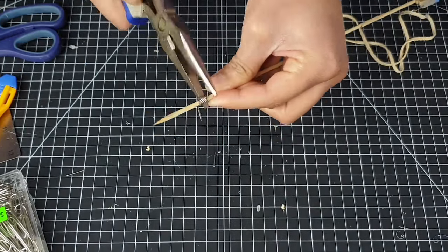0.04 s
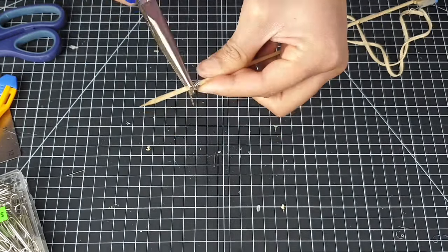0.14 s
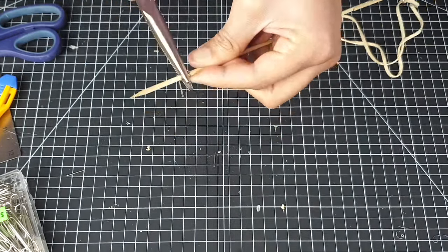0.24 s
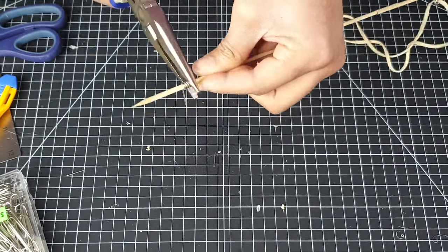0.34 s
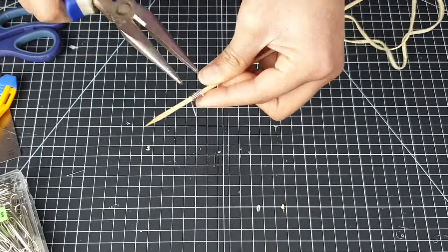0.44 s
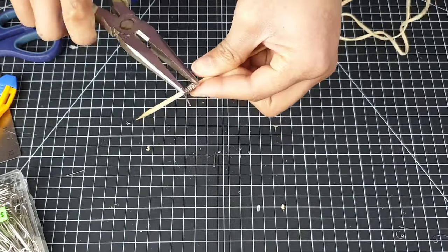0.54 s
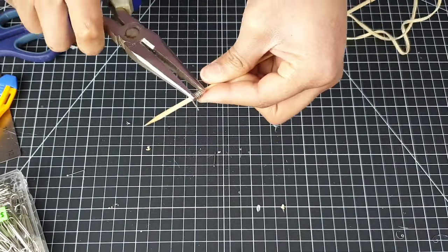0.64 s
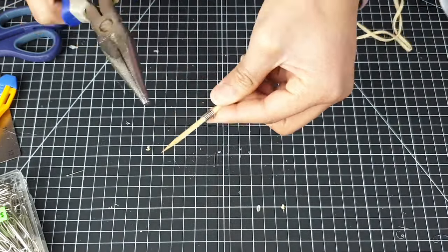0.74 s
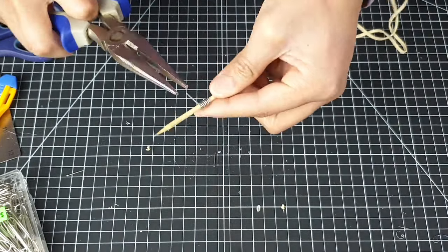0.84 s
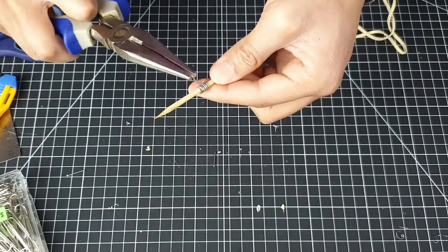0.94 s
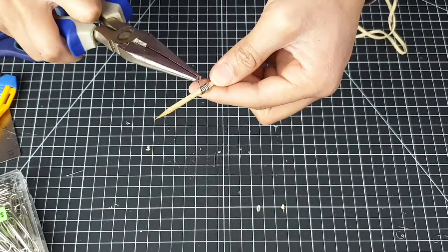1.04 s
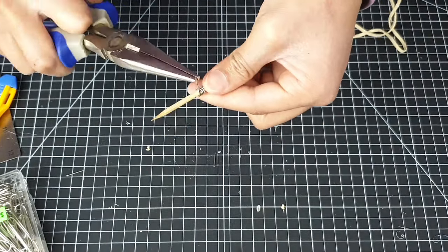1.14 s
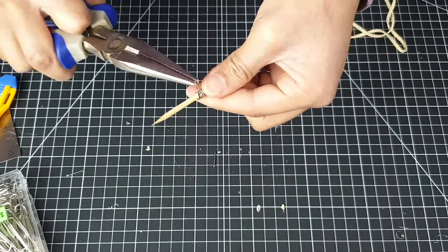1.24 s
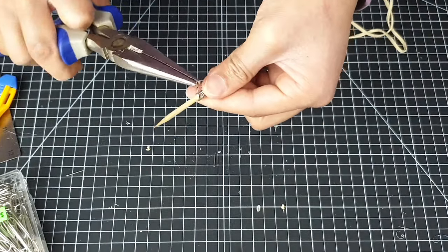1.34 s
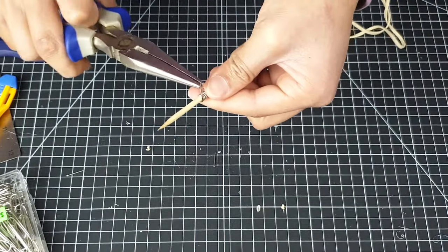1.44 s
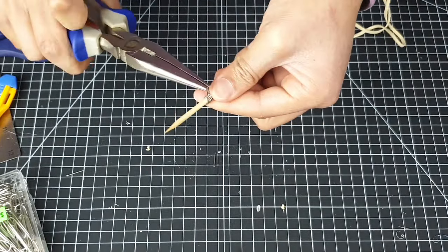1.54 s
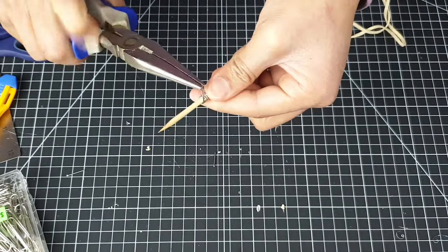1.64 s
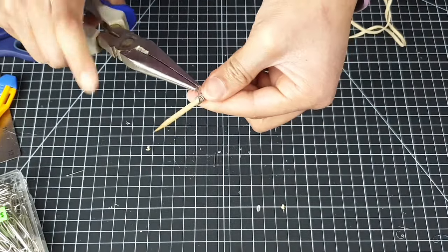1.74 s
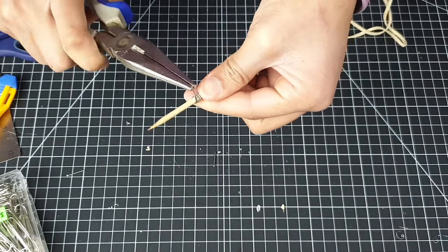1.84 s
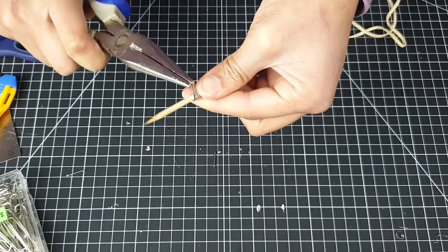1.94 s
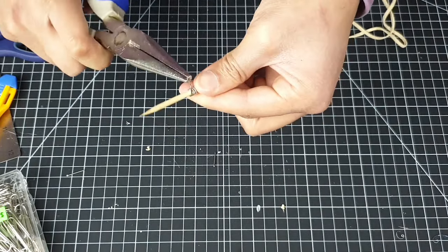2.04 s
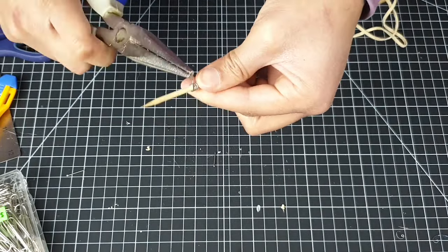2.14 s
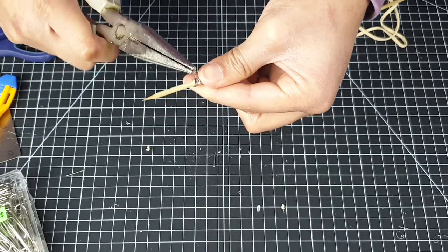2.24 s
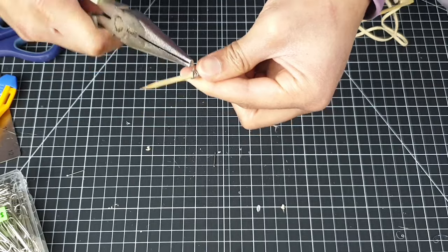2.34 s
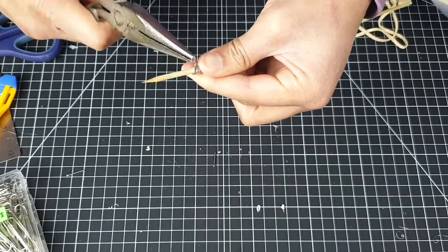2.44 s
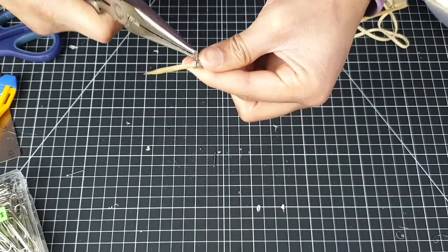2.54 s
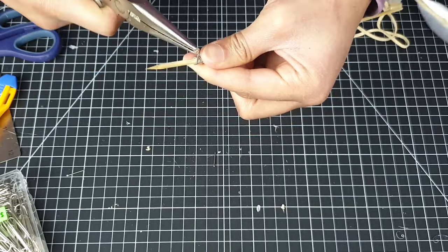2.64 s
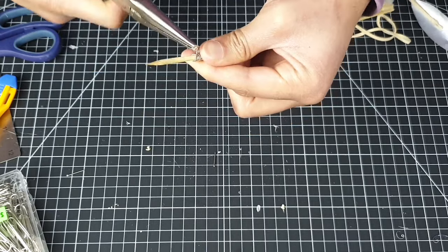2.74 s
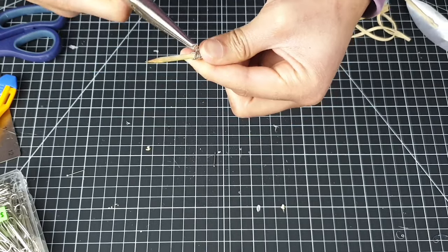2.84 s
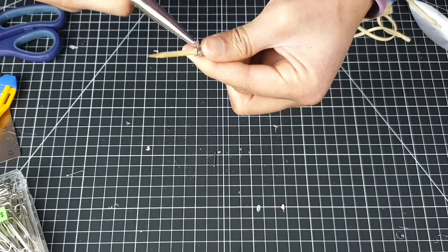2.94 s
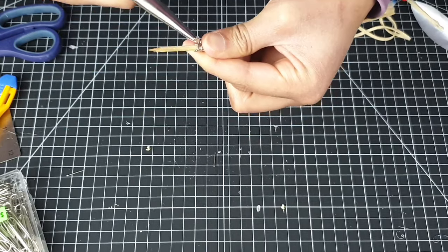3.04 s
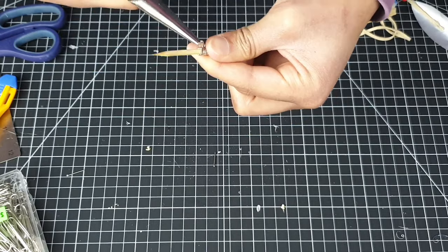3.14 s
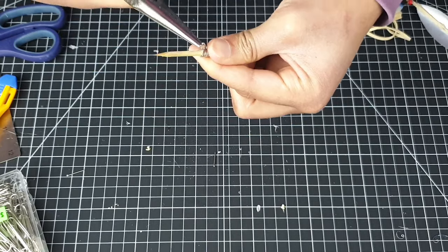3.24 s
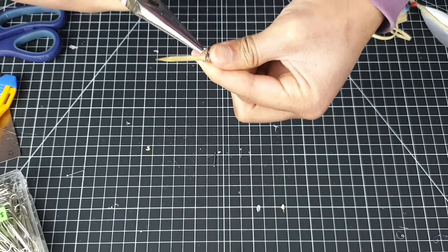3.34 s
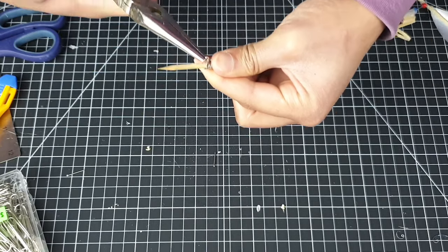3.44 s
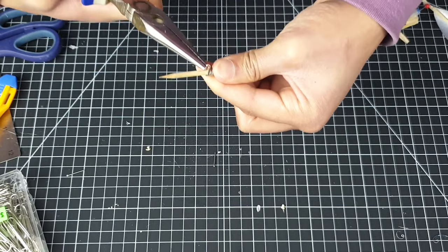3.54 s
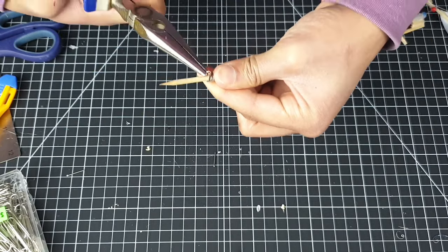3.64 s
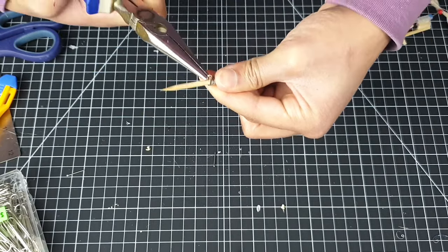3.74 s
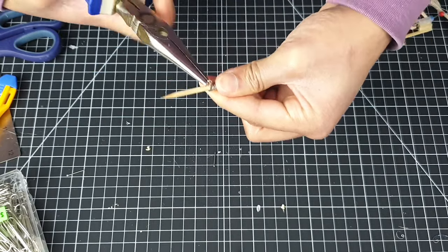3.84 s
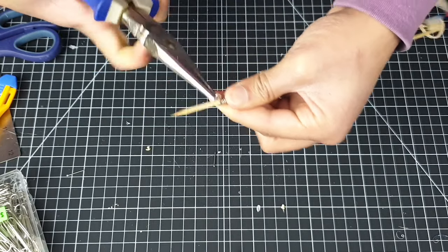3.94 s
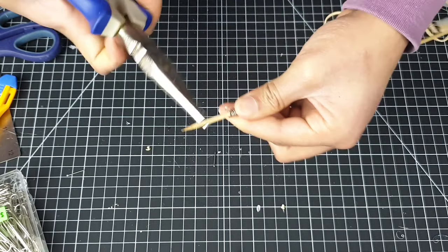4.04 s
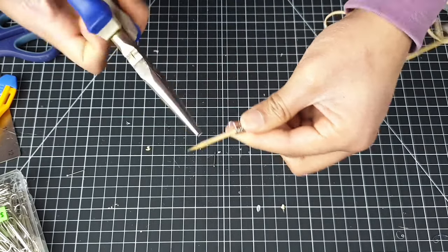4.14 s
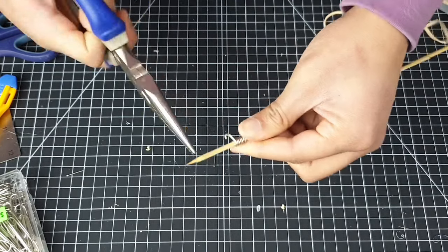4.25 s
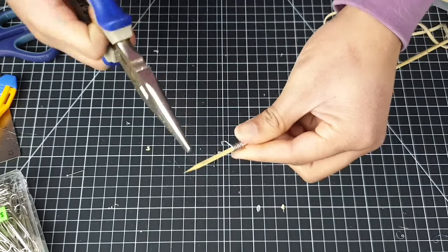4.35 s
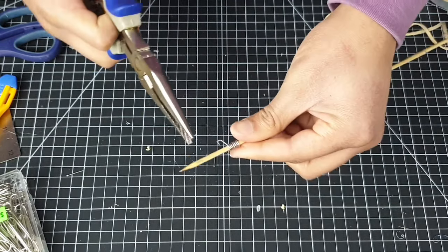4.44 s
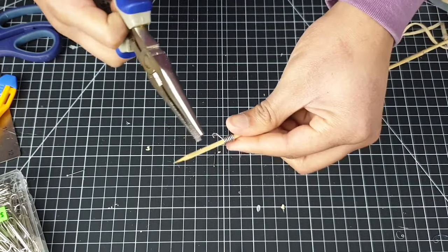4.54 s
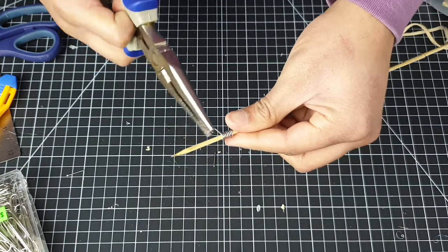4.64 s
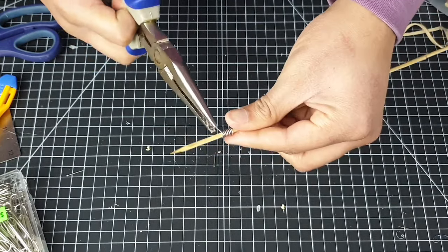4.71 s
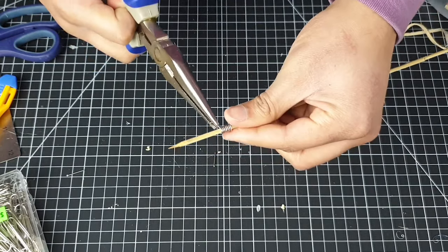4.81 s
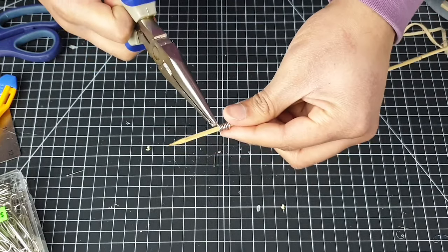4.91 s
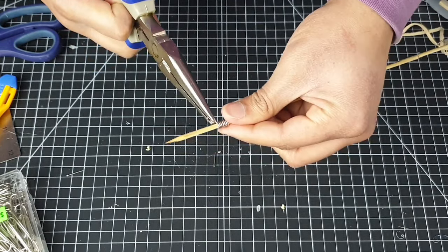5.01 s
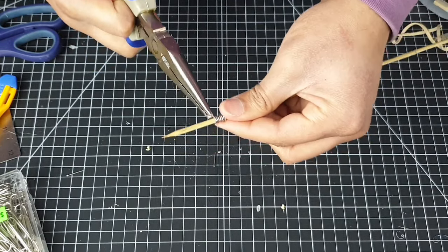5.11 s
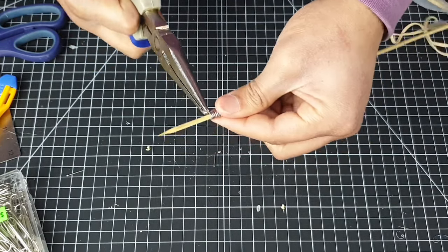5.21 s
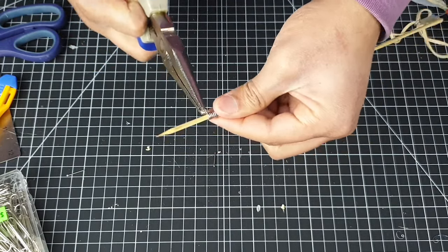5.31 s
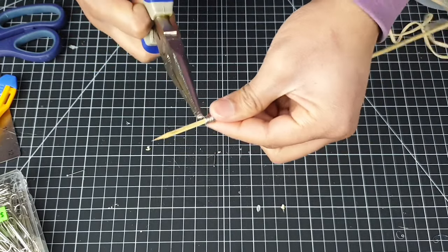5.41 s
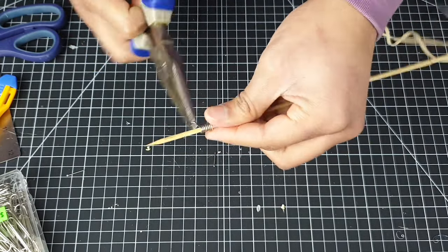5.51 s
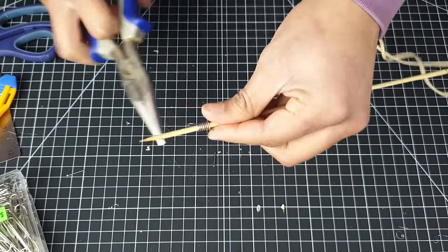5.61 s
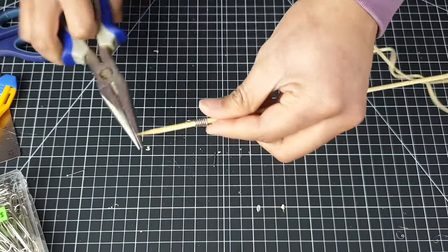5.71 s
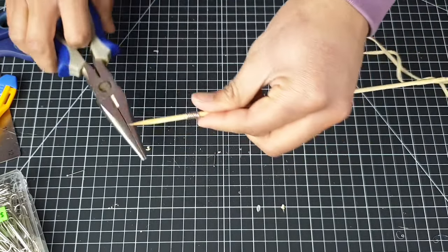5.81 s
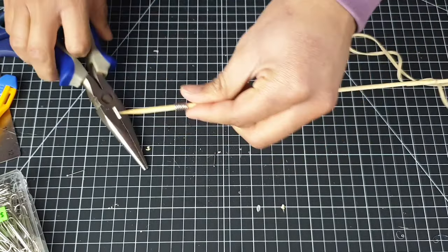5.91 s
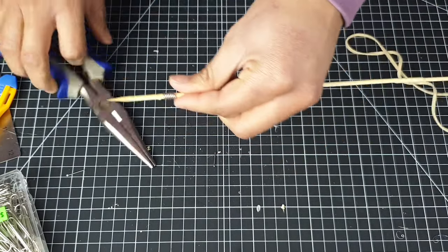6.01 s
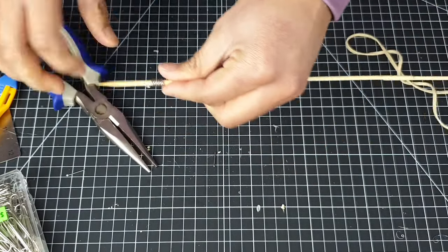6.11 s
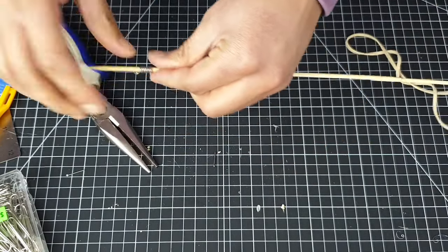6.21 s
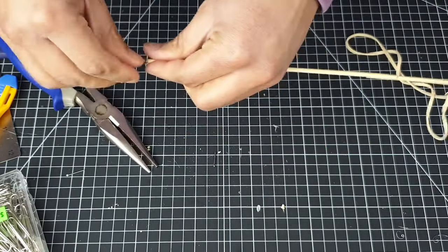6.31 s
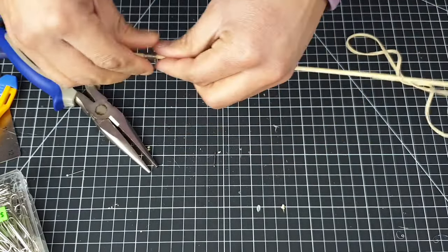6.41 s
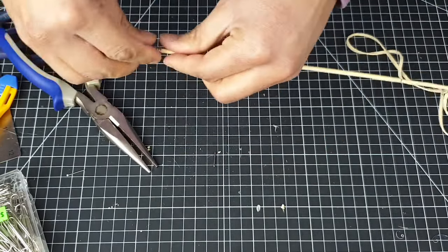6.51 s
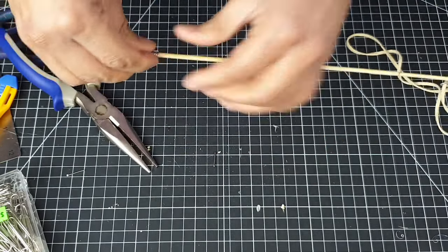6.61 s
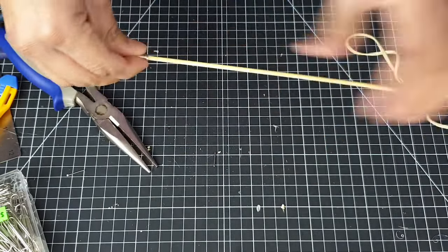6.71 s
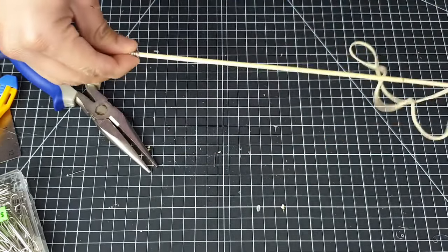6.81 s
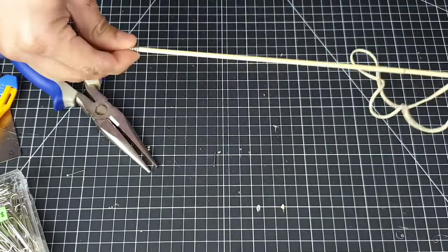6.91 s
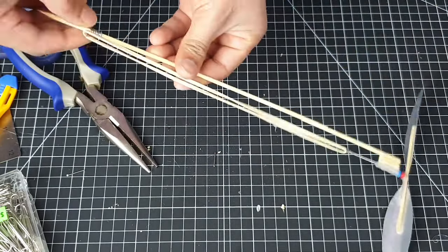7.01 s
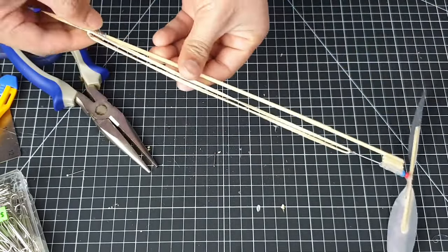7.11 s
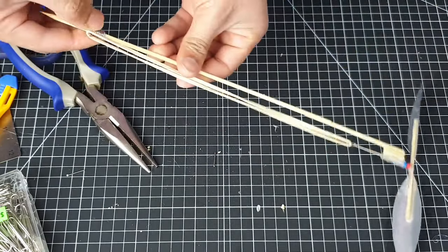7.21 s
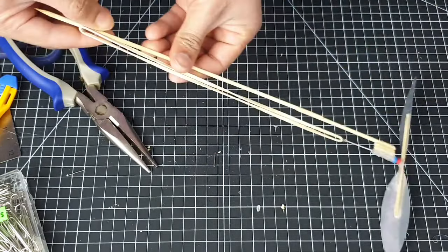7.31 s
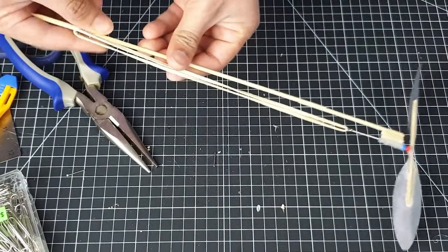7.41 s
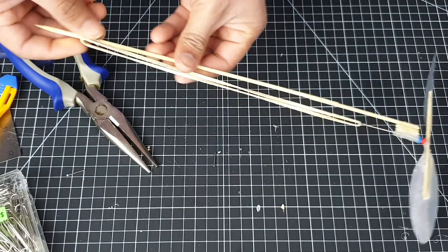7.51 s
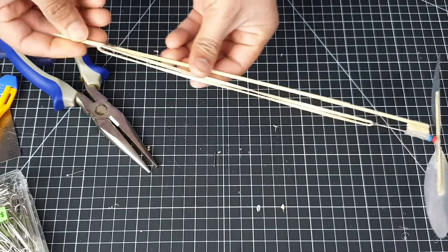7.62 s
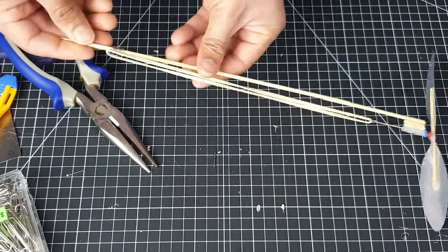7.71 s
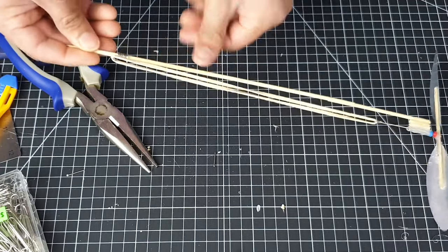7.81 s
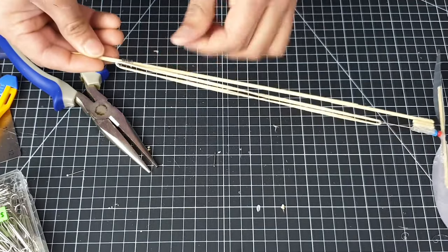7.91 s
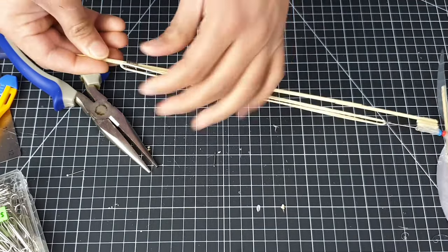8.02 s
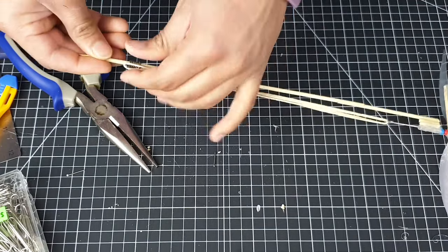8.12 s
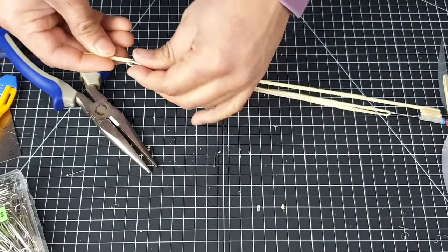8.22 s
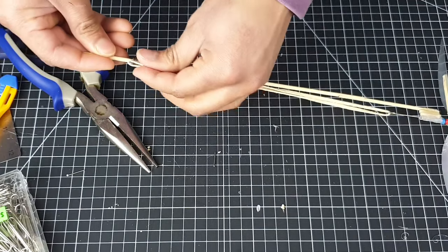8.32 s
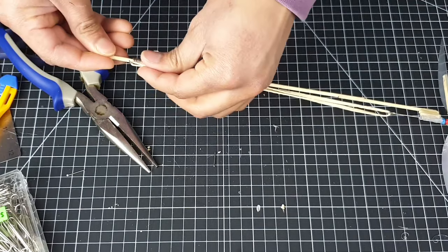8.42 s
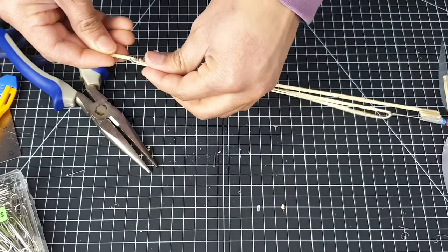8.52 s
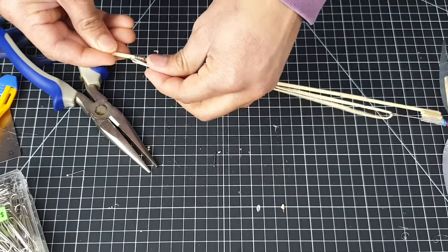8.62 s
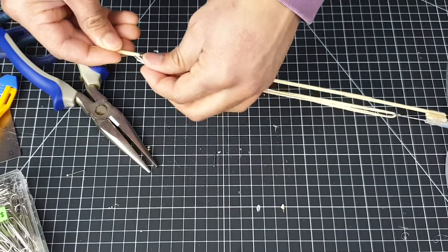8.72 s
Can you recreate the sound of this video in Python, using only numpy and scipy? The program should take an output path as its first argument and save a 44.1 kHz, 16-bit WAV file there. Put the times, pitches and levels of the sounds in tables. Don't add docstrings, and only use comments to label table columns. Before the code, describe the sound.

Small dry clicks and gritty scrapes of pliers on wire, then a heavy double thud on the desktop, a bright snap and light wooden rattling.

```python
import sys
import numpy as np
from scipy import signal
from scipy.fft import rfft, irfft, next_fast_len
from scipy.io import wavfile
from scipy.ndimage import uniform_filter1d

SR = 44100
rng = np.random.default_rng(int(sys.argv[2]) if len(sys.argv) > 2 else 0)


def voltage_ratio(decibels):
    exponent = np.asarray(decibels, float) / 20
    return 10 ** exponent


def transcribe(signal):
    frames = np.atleast_2d(signal).T
    limited = np.clip(frames, -1, 1)
    pcm = np.round(limited * 32767).astype(np.int16)
    wavfile.write(sys.argv[1], SR, pcm)


N = 386316
CUT_S = 1.198
STICK_FROM_S = 7.8


def level(x, db):
    return x * voltage_ratio(db) / np.sqrt(np.mean(x ** 2))


def at(table, hz):
    f, v = np.transpose(table)
    return np.interp(np.log(hz + 1), np.log(f), v)


def causal(table, size=1024):
    cepstrum = irfft(np.log(voltage_ratio(at(table, np.arange(size + 1) * SR / 2 / size))))
    cepstrum[1:size] *= 2
    cepstrum[size + 1:] = 0
    return irfft(np.exp(rfft(cepstrum)))[:size]


def ring(modes, seconds, gains=1):
    hz, db, t60 = np.transpose(modes)[:, :, None]
    t = np.arange(int(seconds * SR)) / SR
    fading = np.reshape(gains, (-1, 1)) * voltage_ratio(db - 60 * t / t60)
    return np.sum(fading * np.sin(2 * np.pi * hz * t), axis=0)


def walk(rate):
    hold = int(SR / rate)
    steps = np.repeat(rng.standard_normal(N // hold + 1), hold)
    return 1.3 * uniform_filter1d(uniform_filter1d(steps, hold), hold)[:N]


def add(bus, s, sound):
    i = int(s * SR)
    n = min(sound.shape[-1], bus.shape[-1] - i)
    bus[..., i:i + n] += sound[..., :n]


def tone(x, treble_db, body_db, top_hz=5800, low_hz=1700):
    top = signal.sosfiltfilt(signal.butter(3, top_hz, "high", fs=SR, output="sos"), x)
    low = signal.sosfiltfilt(signal.butter(1, [280, low_hz], "band", fs=SR, output="sos"), x)
    return x + (voltage_ratio(treble_db) - 1) * top + (voltage_ratio(body_db) - 1) * low


def ports(x, pan_db, lag, bounce=0.):
    delayed = x[np.clip(np.arange(N) - np.round(lag).astype(int), 0, N - 1)]
    left = delayed + bounce * np.roll(x, 61)
    right = x + bounce * np.roll(x, 38)
    return np.array([left * voltage_ratio(pan_db / 2), right * voltage_ratio(-pan_db / 2)])


def air(colour, sides, rings, db, alike_hz, flicker_db=1.3):
    f = np.arange(N // 2 + 1) * SR / N
    shape = at(colour, f) + sum(g / (1 + (2 * (f - hz) / w) ** 2) for hz, w, g in rings)
    alike = 0.45 / (1 + (f / alike_hz) ** 2)
    mid, side = rfft(rng.standard_normal((2, N)))
    pair = np.array([mid * np.sqrt(1 + alike) + k * side * np.sqrt(1 - alike) for k in (1, -1)])
    pair = pair * voltage_ratio(shape + np.array([[.5], [-.5]]) * at(sides, f))
    octave = np.clip(np.log2(f / 60 + 1).astype(int), 0, 8)
    out = sum(irfft(pair * (octave == k), N) * voltage_ratio(flicker_db * walk(9)) for k in range(9))
    return out * voltage_ratio(db) / np.sqrt(np.mean(out.mean(axis=0) ** 2))


# frequency in Hz, level in dB per Hz.
HISS_COLOUR = [(18, -77), (30, -57), (123, -43), (285, -16.5), (1170, -21), (1300, -22), (1560, -27.5),
               (1830, -20.5), (1970, -27), (2310, -16), (3080, -17.5), (3420, -15), (8330, -23),
               (9740, -34.5), (15600, -43)]
# frequency in Hz, left minus right in dB.
HISS_LEAN = [(60, 4), (110, 2), (200, 4), (380, 6), (700, 3.5), (1290, 2.5), (2380, 8.5), (4400, 19),
             (8120, 18.5), (15000, 18)]
# frequency in Hz, width in Hz, lift in dB.
HISS_PEAKS = [(3440, 125, 12), (4350, 140, 5), (5000, 320, 7)]


def dry_hiss():
    return air(HISS_COLOUR, HISS_LEAN, HISS_PEAKS, db=-70, alike_hz=1300)


# frequency in Hz, level in dB per Hz.
CONTACT_COLOUR = [(120, -57), (200, -24.5), (844, -14), (1260, -11.5), (1600, -5), (2100, -7), (2570, -6),
                  (3300, -3), (3900, -3), (4600, 1), (7390, -8), (8390, -14), (11700, -9), (15600, -24.5)]
# frequency in Hz, level in dB, t60 in s.
JAW_MODES = [(2560, -14, 0.014), (3170, -0.5, 0.012), (3720, -16, 0.03), (4360, -17.5, 0.06),
             (4620, -5, 0.044), (5000, -11, 0.018), (6300, -6, 0.025)]
# frequency in Hz, level in dB, t60 in s.
STICK_MODES = [(1600, -16, 0.021), (2186, -5, .03), (2970, -5.5, .025), (3720, -3.5, 0.061),
               (4360, -2.5, 0.027), (5070, -6.5, 0.022), (6140, -10, 0.019), (6800, -9, .018),
               (7290, -9.5, 0.026), (10700, -2.5, .01)]
# time of the peak in s, peak in dB, ring in Hz, treble in dB.
JAW_TAPS = [(0.0297, -60.5, 7730, -5), (0.206, -63, 7540, 6), (1.029, -64, 7500, 7),
            (1.5368, -40, 7140, 7.5), (1.9239, -41.5, 4330, -1.5), (2.7399, -41, 4630, -19),
            (4.0224, -45, 4500, -18), (4.9765, -50, 3350, -17), (5.6841, -45.5, 4600, -6),
            (7.9625, -38, 6200, 6)]
WOOD_KNOCKS = [(0.062, -65, 14000, 4), (0.7463, -48.5, 12200, 10), (0.8963, -47, 7600, 16),
               (1.1163, -50.5, 7700, 6), (1.1936, -62, 7200, 18), (1.218, -60, 1570, -4),
               (2.7952, -45, 4430, -14), (5.1565, -54.5, 5220, -6), (5.2474, -54.5, 2560, -10),
               (5.405, -58.5, 3220, -16), (5.5256, -52, 7040, 14), (6.2821, -41, 4600, -1),
               (8.1344, -48, 7350, -4), (8.5708, -61.5, 4450, -1.5)]
WIRE_GRINDS = [(0.0907, -65.5, 10300, 0), (0.9635, -69, 7760, 19), (2.093, -45, 7250, 2),
               (2.8251, -39, 4600, -20), (3.348, -54, 5300, -3), (3.4096, -39, 4900, 2.5),
               (3.4458, -34, 4620, 5), (3.4868, -32.5, 4730, 6), (3.522, -39.5, 4620, 1.5),
               (3.6185, -38, 5430, 4.5), (3.7299, -46.5, 6140, -4), (3.8047, -49, 2820, -3.5),
               (3.897, -47.5, 4800, -8), (7.0212, -56, 5000, 11), (7.0918, -44.5, 5470, 0),
               (7.352, -38.5, 4360, -4.5), (8.4432, -60, 4500, -13)]
WIRE_SLIPS = [(0.1742, -68, 6440, 8), (0.514, -63, 11000, 20), (2.341, -51, 6140, -9),
              (2.3854, -50, 6300, 12), (2.46, -48.5, 4930, 12), (3.97, -57, 4930, 7),
              (4.058, -50.5, 6300, 7.5), (4.1145, -37, 11200, 0.5), (4.2114, -36.5, 4560, 4),
              (4.2902, -42, 4900, -4.5), (4.4225, -42, 7040, -2.5), (5.498, -59, 6900, 0),
              (6.5498, -43, 10540, 4.5), (7.16, -43, 6170, 1), (8.0044, -39, 4360, 6),
              (8.0295, -45, 4340, -3), (8.0461, -36.5, 2980, 14), (8.083, -41, 3720, 14),
              (8.119, -39, 2160, 9)]
LIGHT_DRAGS = [(0.4353, -62.5, 14350, 3), (0.681, -66, 10200, -12), (1.6983, -62.5, 4440, -5),
               (2.6583, -52, 4450, -8), (2.9836, -48, 4770, -3), (3.036, -55, 4840, -7),
               (3.275, -60, 6960, -4), (7.9887, -52, 4450, -12), (8.1702, -46, 5030, -2.5),
               (8.258, -37, 4360, 6.5), (8.3587, -70.5, 4350, -16.5), (8.677, -42, 3960, -6),
               (8.699, -34, 3770, 2.5), (8.7165, -48, 6830, 8)]
WIRE_SNAPS = [(0.8114, -59, 8500, -5), (1.7276, -55.5, 3920, 0), (2.213, -52.5, 4740, -6.5),
              (2.2837, -54, 7200, -1), (2.371, -39.5, 6050, 6), (2.5473, -42, 4800, -8.5),
              (2.6205, -48, 4490, -12), (4.095, -45, 4670, -3), (4.5406, -42, 5900, -4),
              (4.8023, -43, 5630, -4), (4.9176, -54, 5000, -15), (4.9338, -52, 2720, -18),
              (5.1926, -53.5, 3380, -21), (5.331, -48.5, 2560, -20), (5.549, -52.5, 6300, 20),
              (5.6573, -31.5, 7260, 2.5), (6.4369, -41, 4460, 12), (6.4532, -34, 4300, 2),
              (7.7738, -16.5, 10950, -3), (8.616, -39.5, 3790, -6)]
SHORT_CONTACTS = [(2.8563, -39, 4600, -26), (2.8702, -40, 4600, -26), (2.076, -56, 7000, 8),
                  (7.3797, -41, 6500, 4), (6.041, -37, 6500, -8), (5.985, -33, 6000, -7)]
LEAD_IN_SLIPS = [(2.732, -49.5, 6800, 8), (2.815, -43, 1700, -16), (3.402, -46, 4540, -4),
                 (4.1944, -43.5, 5900, 8.5), (7.139, -48, 1500, -7), (4.009, -56, 6190, -7),
                 (4.035, -50.5, 6940, 10), (4.436, -49.5, 5000, 9), (7.771, -46.5, 5000, -2.5),
                 (8.134, -49.5, 6100, 7.5), (6.329, -49, 9300, -6), (7.005, -60.5, 4780, 10),
                 (7.079, -52, 5000, 9), (7.148, -44.5, 5730, -3), (7.333, -49, 5180, -5),
                 (8.229, -40, 5070, 4)]
WIRE_SHUFFLES = [(3.722, -47.5, 5620, -9), (3.778, -45.5, 4800, -3), (3.865, -54.5, 4900, -3),
                 (3.881, -48.5, 4560, -1), (4.205, -37.5, 4700, 6.5), (4.216, -44, 7300, 7)]
PLIER_LANDINGS = [
    (5.9707, -25.5, 1750, -19),
    (6.0553, -29.5, 1750, -15.5),
    (6.0831, -16.5, 3300, 1.5),
    (6.1385, -25.5, 3940, -9),
]
HANDLE_CHATTER = [
    (5.992, -34, 10200, 0),
    (6.0416, -35, 2100, -15.5),
    (6.1264, -35.5, 2960, -2.5),
]


def ticks(lead_s=0.00091, settle_db=-19):
    own_db, jaws_db, stick_db, grit_db, settle_s = -27, -43, -32.5, 2., .007
    kinds = [(WIRE_SNAPS, -16.5, .6), (JAW_TAPS, -13.5, .7), (WOOD_KNOCKS, 2.64, 1), (WIRE_SLIPS, -27, 3.1),
             (WIRE_GRINDS, -6, 4.9), (LIGHT_DRAGS, -36, 5.5), (PLIER_LANDINGS, 5.1, .6),
             (HANDLE_CHATTER, 17, 3.7), (LEAD_IN_SLIPS, -5, 1.7), (WIRE_SHUFFLES, -15, 5.0),
             (SHORT_CONTACTS, -13, 1.5)]
    out, body = np.zeros(N), causal(CONTACT_COLOUR)
    t = np.arange(4096) / SR
    contacts = [(*row, body_db, ms) for rows, body_db, ms in kinds for row in rows]
    for s, db, hz, treble_db, body_db, ms in contacts:
        grit = rng.standard_normal(len(t)) * voltage_ratio(grit_db * rng.standard_normal(len(t)))
        build = 1.5 * max(ms, .4) / 1000
        force = (t / build * np.exp(1 - t / build)) ** 2
        settling = voltage_ratio(settle_db) * (t > build) * np.exp(-(t - build) / settle_s)
        slip = grit * (force + settling)
        note_t60 = (.005 + .7 * build) * min(4500 / hz, hz / 4500)
        note = voltage_ratio(own_db) * ring([(hz, 0, note_t60)], .05)
        if s > STICK_FROM_S:
            struck = voltage_ratio(stick_db) * ring(STICK_MODES, .05, 1 + .4 * rng.standard_normal(len(STICK_MODES)))
            body_db -= 5.0
        else:
            struck = voltage_ratio(jaws_db) * ring(JAW_MODES, .05, rng.standard_normal(len(JAW_MODES)))
        sound = signal.fftconvolve(slip, body)[:len(t)]
        sound += signal.fftconvolve(slip, note + struck)[:len(t)]
        sound = tone(sound, treble_db + 10.0, body_db + 11.5)
        add(out, s - build - lead_s, sound * voltage_ratio(db + 4.5) / np.abs(sound).max())
    return out


# frequency in Hz, t60 in s.
ROOM_DECAY = [(150, 0.42), (500, 0.72), (1500, 0.48), (3500, 0.4), (7000, 0.34), (13000, 0.24)]


def room(x, wet_db, lean_db, alike_hz=700):
    t = np.arange(int(.9 * SR)) / SR
    f = np.arange(len(t) // 2 + 1) / t[-1]
    alike = 1 / (1 + (f / alike_hz) ** 2)
    tail, centres = 0, np.log(np.array(ROOM_DECAY)[:, 0])
    for k, (hz, t60) in enumerate(ROOM_DECAY):
        share = np.interp(np.log(f + 1), centres, np.arange(len(centres)) == k)
        left, right, both = rfft(rng.standard_normal((3, len(t))))
        pair = np.sqrt(alike) * both + np.sqrt(1 - alike) * np.array([left, right])
        tail = tail + irfft(pair * np.sqrt(share), len(t)) * voltage_ratio(-60 * t / t60)
    mid_side = rfft(np.array([tail[0] + tail[1], tail[0] - tail[1]]) / 2)
    power = np.abs(mid_side) ** 2
    even = uniform_filter1d(power, size=1200, axis=1) / (uniform_filter1d(power, size=90, axis=1) + 1e-9)
    mid, side = irfft(mid_side * np.where(f > alike_hz, np.sqrt(even), 1), len(t))
    tail = np.array([mid + side, mid - side]) * (t < .85)
    tail = tail * np.clip(t / 0.001, 0, 1)
    wet = signal.fftconvolve(x[None], tail, axes=1)[:, :N]
    return wet * voltage_ratio(wet_db + np.array([lean_db, -lean_db]).reshape(2, -1) / 2)


# start in s, level in dB, frequency in Hz, t60 in s.
LONE_NOTES = [(.06, -72, 500, 0.12), (1.116, -68.5, 660, 0.14), (7.089, -66.5, 266, 0.064),
              (7.345, -64, 270, 0.089), (6.4, -66.5, 160, 0.14), (6.136, -31, 4100, 0.03),
              (2.8545, -37, 4600, .03), (2.8685, -38, 4580, .03), (8.614, -44, 3790, .05),
              (8.698, -46, 2900, 0.083), (6.054, -31, 1700, .025), (6.14, -40, 970, 0.045),
              (5.97, -28.5, 1780, 0.031)]


def lone_notes():
    out = np.zeros(N)
    for s, db, hz, t60 in LONE_NOTES:
        add(out, s, ring([(hz, db, t60)], .9))
    return ports(out, 7.5, lag=0)


# frequency in Hz, level in dB per Hz.
HUM_COLOUR = [(15, -41.5), (25, -9.5), (104, -10.5), (306, -17.5), (458, -10), (584, -10), (650, -7),
              (764, -10), (923, -11), (1420, -13), (2500, -28), (4770, -24.5), (8630, -32.5), (12200, -25),
              (15600, -26.5)]
# frequency in Hz, left minus right in dB.
HUM_LEAN = [(60, 2.5), (110, 3.5), (200, 6), (380, 4), (700, 15.5), (1290, 19), (2380, -1.5), (4400, 16),
            (8120, 5.5), (15000, 2.5)]
# frequency in Hz, width in Hz, lift in dB.
HUM_PEAKS = [(654, 30, 10), (843, 20, 9), (930, 43, 8), (1064, 32, 6)]
# start in s, depth in dB, recovery in s.
GAIN_DUCKS = [
    (1.2, -1.5, 0.096),
    (5.97, -2, 0.48),
]


def room_hum():
    t = np.arange(N) / SR
    duck_db = sum(db * (t > s) * np.exp(-np.abs(t - s) / back_s) for s, db, back_s in GAIN_DUCKS)
    return air(HUM_COLOUR, HUM_LEAN, HUM_PEAKS, db=-68.5, alike_hz=550) * voltage_ratio(duck_db)


# frequency in Hz, extra left minus right in dB.
PORT_SHADE = [(300, 4.5), (1400, 3.5), (2800, 2), (5000, 0.5), (7300, -6.5), (12000, -1)]


def shaded(pair):
    size = next_fast_len(N)
    lean_db = at(PORT_SHADE, np.arange(size // 2 + 1) * SR / size)
    return irfft(rfft(pair, size) * voltage_ratio(np.array([[.5], [-.5]]) * lean_db), size)[:, :N]


# centre in s, level in dB, frequency in Hz, width in Hz,
# length in ms.
SUNG_BANDS = [(5.999, -44, 9900, 1500, 30), (6.095, -40, 9700, 1200, 24), (6.97, -66, 800, 400, 80),
              (2.15, -73, 1050, 200, 220), (3.49, -56, 2500, 500, 80), (3.89, -60, 2600, 500, 60),
              (7.357, -54, 1900, 900, 40), (2.83, -51, 1700, 850, 85), (2.835, -55, 4580, 210, 61),
              (8.0, -62, 2990, 160, 360), (5.41, -68, 917, 210, 182), (5.581, -80.5, 96.5, 13, 300),
              (8.05, -60, 3720, 150, 175), (8.253, -44.5, 4394, 280, 68), (8.245, -52, 5080, 170, 45),
              (8.257, -52.5, 6330, 290, 50), (8.26, -65, 1600, 140, 70), (8.33, -66, 4360, 180, 120),
              (8.73, -58, 2860, 120, 65), (8.74, -58, 4440, 80, 60)]


def squeaks():
    out = np.zeros(N)
    for s, db, hz, width, ms in SUNG_BANDS:
        n = int(ms * SR / 1000)
        band = signal.butter(2, [hz - width / 2, hz + width / 2], "band", fs=SR, output="sos")
        sung = signal.sosfilt(band, rng.standard_normal(24000))[8000:]
        add(out, s - ms / 2000, level(sung[:n], db) * np.hanning(n))
    return out


# frequency in Hz, width in Hz, depth in dB.
HAND_DIPS = [(3800, 550, -7), (8250, 600, -3)]
# time in s, share from 0 to 1.
HAND_CUPPING = [
    (2.68, 0),
    (2.78, 1),
    (3.1, 1),
    (3.4, .6),
    (3.95, .5),
    (4.1, 0),
]


def cupped(pair):
    size = next_fast_len(N)
    f = np.arange(size // 2 + 1) * SR / size
    dips_db = sum(db * np.exp(-(2 * (f - hz) / width) ** 2) for hz, width, db in HAND_DIPS)
    share = np.clip(np.interp(np.arange(N) / SR, *np.transpose(HAND_CUPPING)), 0, 1)
    return pair + share * (irfft(rfft(pair, size) * voltage_ratio(dips_db), size)[:, :N] - pair)


# start in s, end in s, first level in dB, last level in dB, treble in dB.
RUB_STROKES = [(2.747, 3.1, -60.5, -84, -4.5), (3.225, 3.603, -69.5, -84, 0.5),
               (3.605, 4.26, -67, -74, -10), (4.26, 4.4, -74, -100, 4), (5.197, 5.592, -71, -86, -12),
               (7.008, 7.454, -78.5, -72, -5.5), (7.781, 8.15, -47, -60, -3.5),
               (8.154, 8.363, -65, -80, -8), (8.61, 8.652, -63, -59, -16), (8.658, 8.753, -66, -55, 3)]


def rubbing(patchy_db=5.0, grit_db=2.5):
    jaws_db, stick_db = -36, -34.5
    t, db, treble_db = np.arange(N) / SR, np.full(N, -120.), np.zeros(N)
    for start, end, first_db, last_db, top_db in RUB_STROKES:
        on = (t > start) & (t <= end)
        db[on] = np.interp(t[on], [start, end], [first_db, last_db])
        treble_db[on] = top_db
    treble_db = uniform_filter1d(treble_db, size=2000)
    body_db = -9 - 0.39 * treble_db
    grit = rng.standard_normal(N) * voltage_ratio(grit_db * rng.standard_normal(N) + patchy_db * walk(90))
    sound = signal.fftconvolve(grit, causal(CONTACT_COLOUR))[:N]
    free = t > STICK_FROM_S + .12
    sound += voltage_ratio(jaws_db) * signal.fftconvolve(grit * ~free, ring(JAW_MODES, .08))[:N]
    sound += voltage_ratio(stick_db) * signal.fftconvolve(grit * free, ring(STICK_MODES, .08))[:N]
    return tone(level(sound, 0), treble_db + 8.5, body_db + 6.5) * uniform_filter1d(voltage_ratio(db), 400)


# start in s, strength in dB, push in ms.
DESK_BLOWS = [
    (5.488, -61, 13),
    (5.97, -23, 2.4),
    (5.9816, -10.5, 3.6),
    (6.054, -30.5, 1.2),
    (6.0813, -9, 2.8),
    (6.124, -34.5, 0.54),
    (6.138, -25, 1.35),
    (6.174, -31, 0.96),
    (7.773, -53.5, 1.2),
]
# frequency in Hz, level in dB, t60 in s.
DESK_MODES = [(46, -1, 0.75), (82, -10, 0.56), (98.4, -24, 0.4), (123, -13, 0.5), (160, -3.5, 0.37),
              (189, -12, 0.15), (229.2, -3.5, 0.2), (297.3, -10, 0.22), (393, -16, 0.095),
              (474.2, -14.5, 0.24), (568, -5, 0.095), (648, -25.5, 0.48), (798, -22.5, 0.22),
              (1180, -27, 0.086)]


def desk(thud_db=7.0, pan_db=7.5, spread=0.1, mid_hz=200, lean=1.8):
    out = np.zeros(N)
    thud = voltage_ratio(thud_db) * ring([(187, 1.0, 0.035), (365.6, 1.5, 0.018), (833, -11, 0.02)], 1.2)
    for s, db, ms in DESK_BLOWS:
        phase = np.linspace(0, 1, int(ms * SR / 1000) + 3) ** lean
        push = np.sin(np.pi * phase) ** 2
        jolt = np.diff(push / push.sum()) * SR / (2 * np.pi * mid_hz)
        top = ring(DESK_MODES, 1.2, 1 + spread * rng.standard_normal(len(DESK_MODES)))
        add(out, s, -voltage_ratio(db - 11.0) * signal.fftconvolve(jolt, top + thud))
    return ports(out, pan_db, lag=0)


# frequency in Hz, level in dB, t60 in s.
BOOM_MODES = [(189, -24, .72), (98.4, -35, .95)]


def boom(start_s=6.085, build_s=.07):
    out, tones = np.zeros(N), ring(BOOM_MODES, 1.2)
    add(out, start_s, tones * (1 - np.exp(-np.arange(len(tones)) / SR / build_s)))
    return ports(out, 6.0, lag=0)


# time in s, left minus right in dB, left port late by samples.
HAND_PLACE = [(0, 17.5, -1.5), (1.19, 11.5, 1), (1.21, 6, 5), (2.4, 7.5, 5), (2.8, 8.5, 7), (3.2, 8.5, 5),
              (4.4, 7.5, 7.5), (5.0, 10, 6), (5.42, 10, 7.5), (5.9, 5.5, -3.5), (6.4, 6.5, -4),
              (6.6, 10, 6.5), (7.6, 6, 4), (8.76, 7.5, -1.5)]


def scene():
    t = np.arange(N) / SR
    second = np.clip((t - CUT_S) / 0.0097, 0, 1)
    hands = signal.sosfilt(signal.butter(2, 320, "high", fs=SR, output="sos"), ticks() + rubbing())
    sung = squeaks()
    when, pan_db, lag = np.transpose(HAND_PLACE)
    pan_db, lag = np.interp(t, when, pan_db), np.interp(t, when, lag)
    to_room = (hands + voltage_ratio(-4) * sung) * np.where(t < CUT_S, voltage_ratio(-3.0), 1)
    near = ports(hands + sung, pan_db, lag, bounce=0.26) + room(to_room, -30.5, 0.8 * pan_db)
    near = near * (1 - second) + cupped(shaded(near)) * second
    knocks = desk() + lone_notes()
    wet = room(knocks.mean(axis=0), -36.5, 6.5)
    fade = np.clip((CUT_S + 0.13 - t) / 0.18, 0, 1)
    return near + knocks + wet + boom() + dry_hiss() * fade + room_hum() * second


def roll_off(x):
    return signal.sosfilt(signal.butter(12, 16640, fs=SR, output="sos"), x)


def record(dry):
    dry = dry + voltage_ratio(-87) * rng.standard_normal(dry.shape)
    bass_cut = signal.butter(2, 45, "high", fs=SR, output="sos")
    top_cut = signal.ellip(10, .2, 60, 15850, fs=SR, output="sos")
    mix = signal.sosfilt(np.vstack([bass_cut, top_cut]), dry)
    return roll_off(mix)


dry = scene()
out = record(dry)
transcribe(out)
```